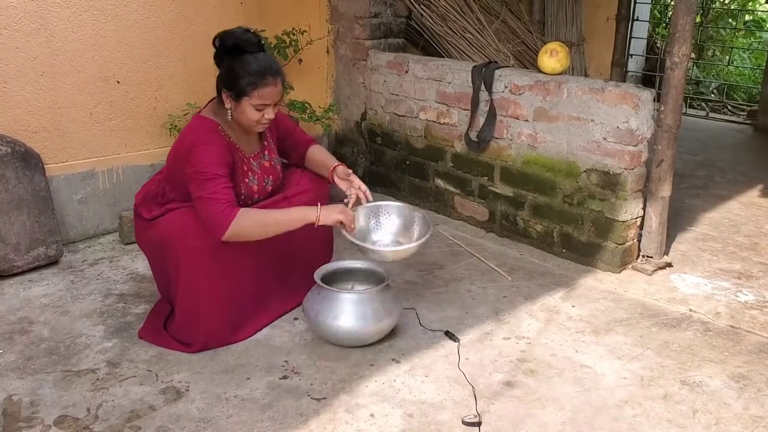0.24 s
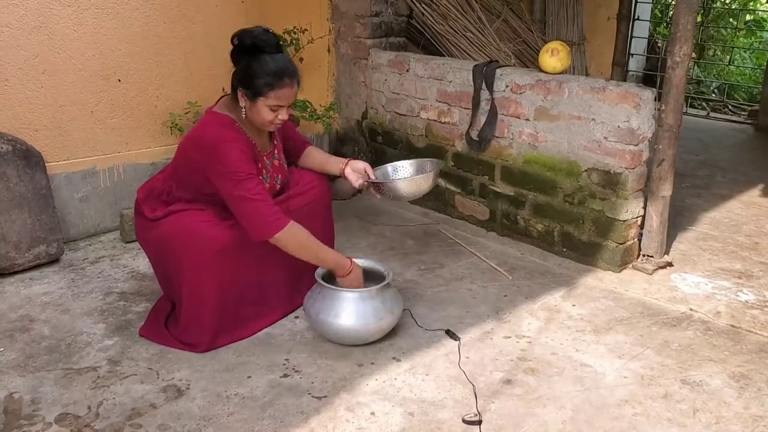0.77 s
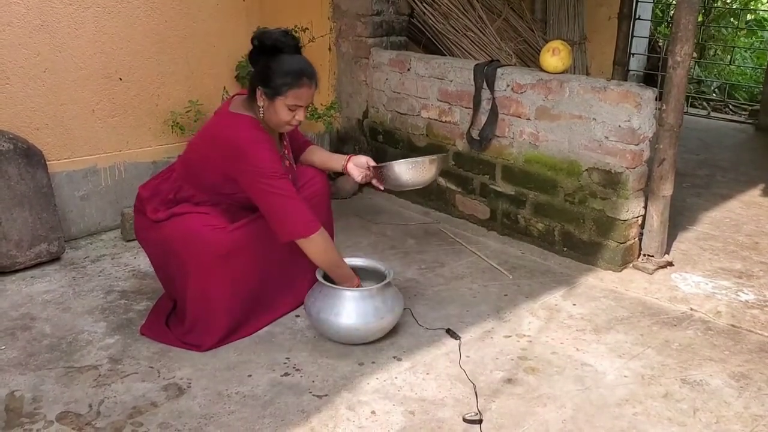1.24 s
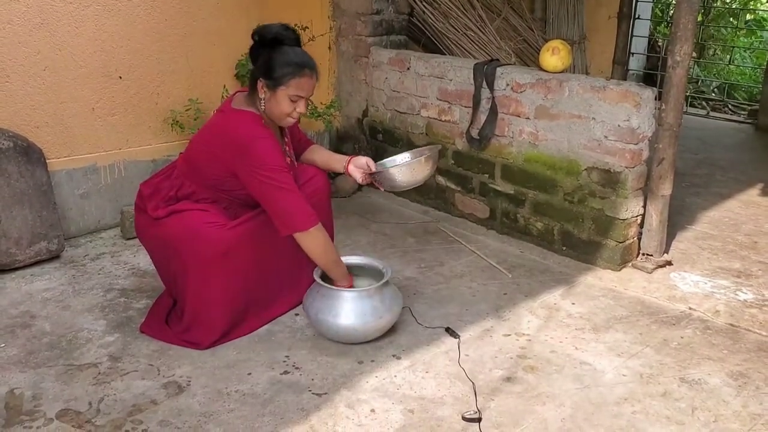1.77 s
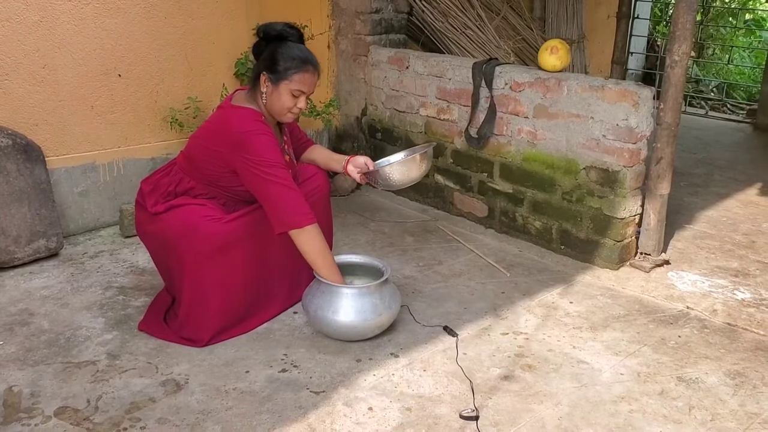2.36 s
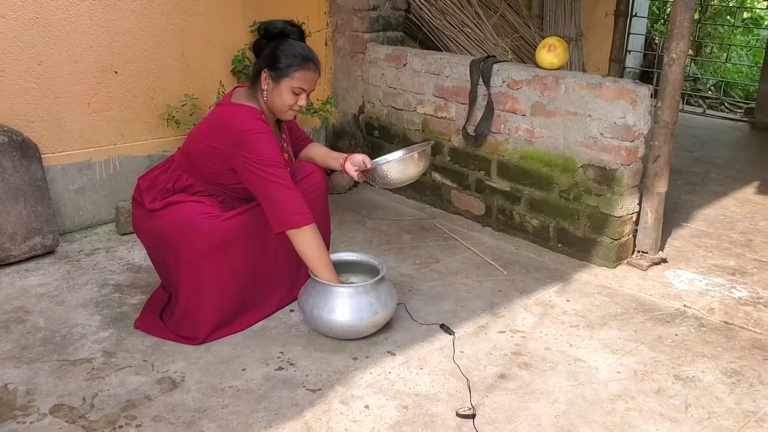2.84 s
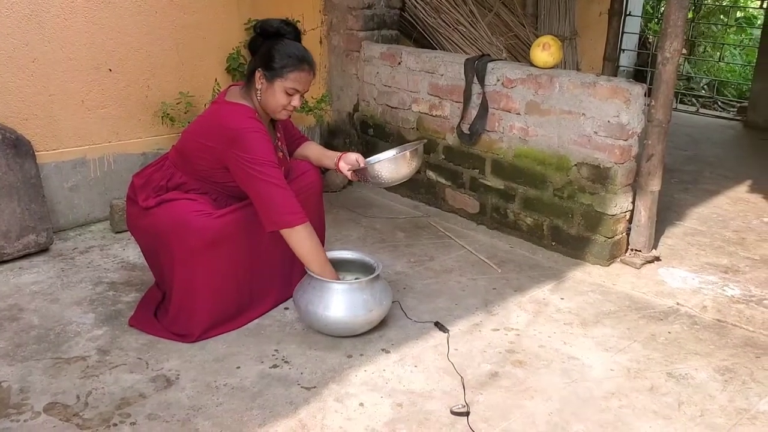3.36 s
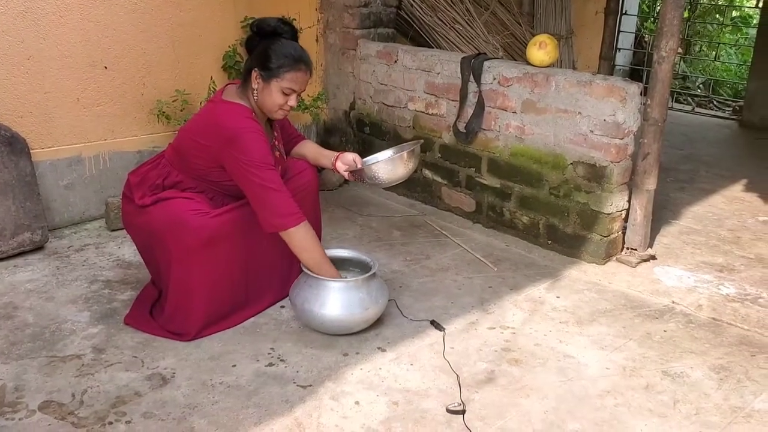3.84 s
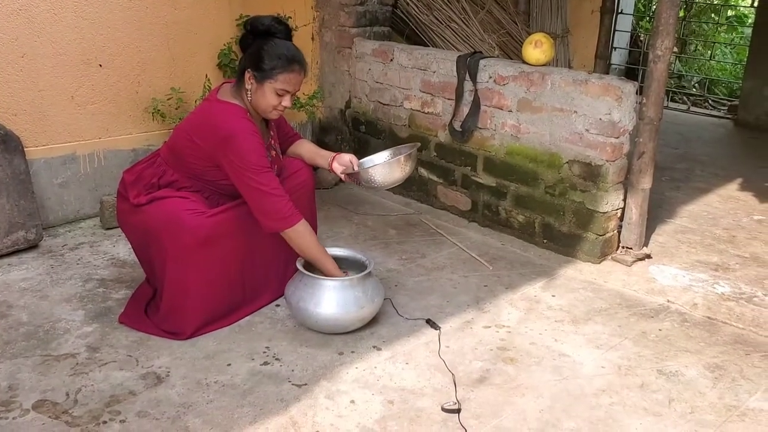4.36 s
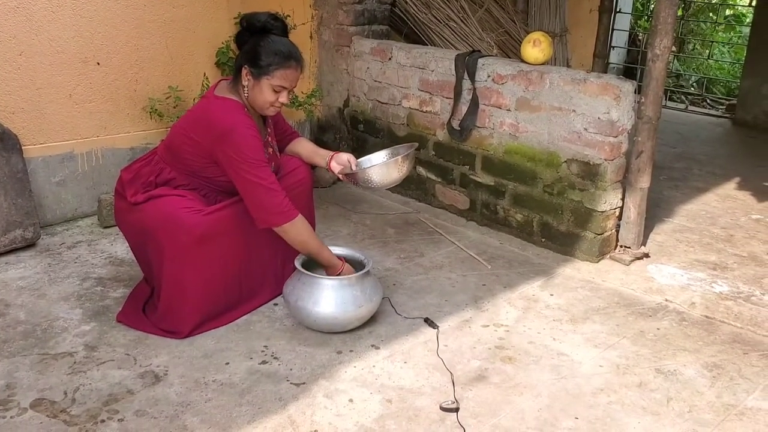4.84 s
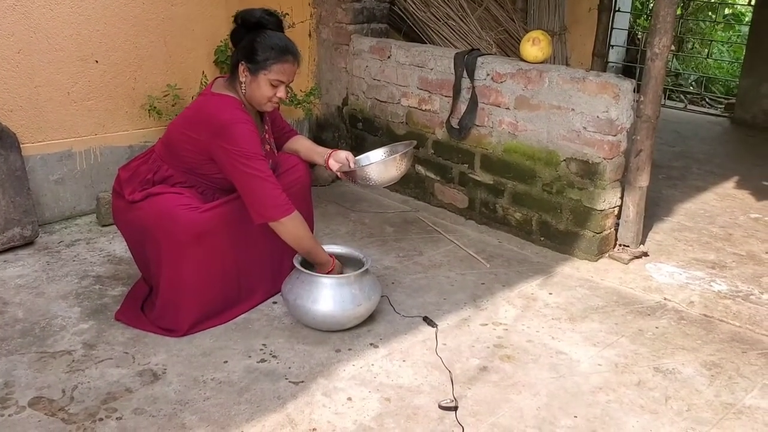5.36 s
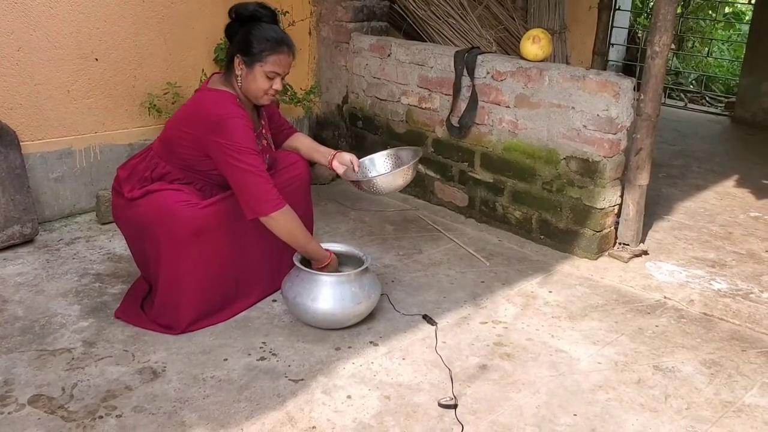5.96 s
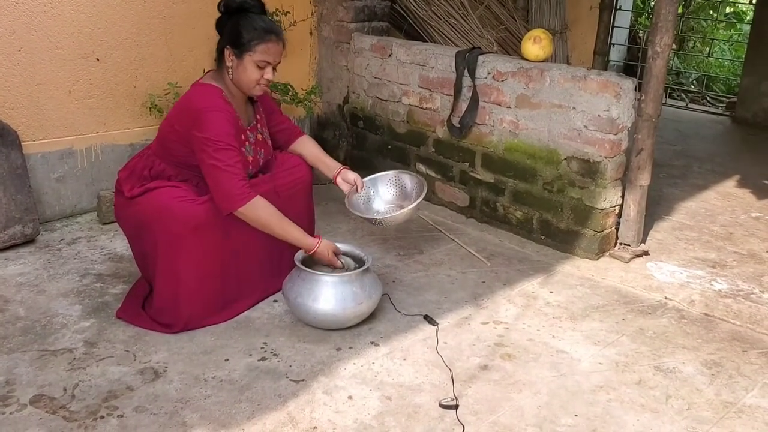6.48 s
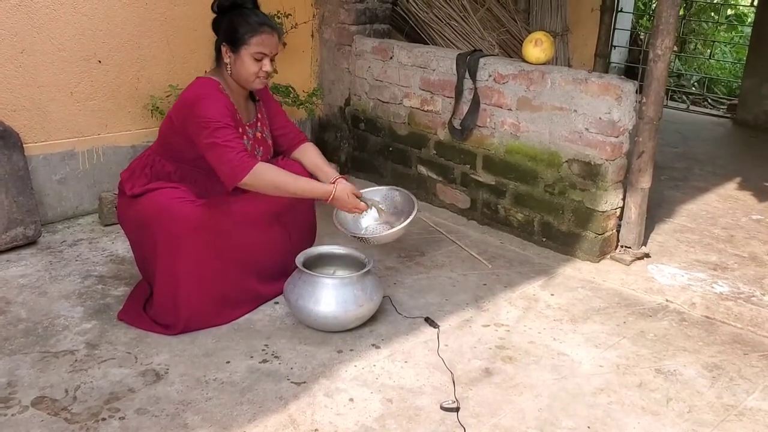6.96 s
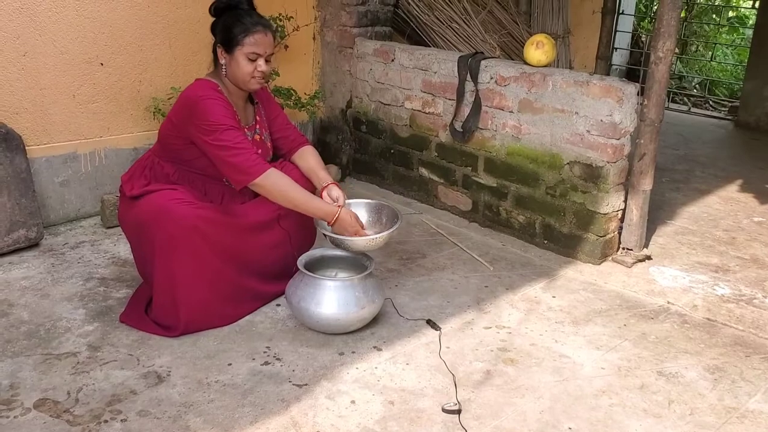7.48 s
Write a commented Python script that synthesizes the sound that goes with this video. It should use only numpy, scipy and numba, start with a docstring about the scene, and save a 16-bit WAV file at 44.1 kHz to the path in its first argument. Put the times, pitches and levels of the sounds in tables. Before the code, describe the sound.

Live fish thrash twice in a metal pot of water, splashing and dripping, with light steel bowl clatter and a faint low hum.

```python
"""Live fish thrash twice in an aluminium pot of water as a hand gropes for them. Surges and slaps throw
up spray and clouds of bubbles, each bubble a damped oscillator, and the pot's belly resonates with them;
then the water laps and drips. A steel bowl in the other hand and the pot's rim ring in their natural
modes when knocked and sing when rubbed. Bangles slide, a sleeve brushes and the yard's walls reflect
these sounds, while a small bird calls and a far motor hums."""
import sys
import numpy as np
from scipy import signal
from scipy.fft import rfft, irfft
from scipy.io import wavfile
from scipy.ndimage import uniform_filter1d
from numba import njit

SR = 44100
rng = np.random.default_rng(int(sys.argv[2]) if len(sys.argv) > 2 else 0)


def log_audio(samples):
    """Write samples as a 16-bit WAV file to the path given in sys.argv[1]."""
    # one column per channel
    frames = np.atleast_2d(samples).T
    # limit to full scale, then quantise
    limited = np.clip(frames, -1, 1)
    pcm = np.round(limited * 32767).astype(np.int16)
    wavfile.write(sys.argv[1], SR, pcm)


N = 340421
TIME = np.arange(N) / SR
TOP_HZ = 15700  # highest starting pitch of a bubble, and the recorder's cutoff

# Surges of the fish. Each row: time of full strength and hold in seconds, fizz level in dB,
# slosh in dB relative to the fizz.
SURGES = [(1.527, .1, -21, -10), (1.96, 0.071, -29, -17.5), (2.075, 0.031, -26.5, -3.5),
          (3.329, 0.11, -29, -12.5), (3.572, 0.047, -28.5, -10), (3.746, 0.017, -34.5, -16.5),
          (3.939, 0.099, -37, -8.5), (4.272, 0.057, -47.5, -1.5)]
# Slaps of fish and hand. Each row: start in seconds, level in dB, depth from 0 glancing to 1 plunging.
SLAPS = [(1.5317, -15, 0.96), (1.5713, -14, .55), (1.6032, -15, .5), (1.6735, -25.5, .5), (1.7157, -25, .6),
         (1.8769, -15.5, .55), (1.9315, -27.5, 0.91), (1.9608, -25.5, 0.13), (2.0446, -19.5, .6),
         (2.0723, -19.5, 0.1), (2.237, -30.5, 0.52), (2.2996, -48, 0.89), (2.445, -41, 0.95),
         (2.637, -45, 0.18), (3.3033, -29, 0), (3.36, -17, .75), (3.384, -25.5, .95), (3.548, -26, .1),
         (3.6334, -23.5, 0), (3.7635, -20, 0.27), (3.81, -26, 0.59), (4.0524, -24, .6), (4.342, -51, .6),
         (4.4008, -37.5, .1)]
# The largest bubbles and drips. Each row: start in seconds, pitch in Hz, level in dB.
BUBBLES = [(1.09, 2150, -29), (1.476, 825, -15.5), (1.538, 637, -2), (1.541, 1560, 6), (1.563, 448, -9),
           (1.63, 1210, -0.5), (1.707, 2390, -1), (1.773, 723, -9.5), (1.796, 2560, -5),
           (1.883, 1330, -10.5), (1.933, 2800, -7), (2.039, 1680, -3.5), (2.057, 798, -7), (2.069, 1595, 0),
           (2.114, 2230, -6.5), (2.304, 2110, -10.5), (2.446, 1410, -9.5), (2.448, 2240, -12.5),
           (2.503, 2620, -16), (2.658, 1730, -27), (2.691, 2610, -26.5), (3.255, 2380, -19),
           (3.299, 2130, -6.5), (3.363, 1950, 0), (3.364, 2820, -0.5), (3.383, 323, -12.5),
           (3.382, 410, -7), (3.383, 1750, -3), (3.411, 313, -10.5), (3.466, 425, -2), (3.468, 722, -10.5),
           (3.495, 754, -12.5), (3.498, 370, -12), (3.513, 3070, -10.5), (3.542, 1434, 1.5),
           (3.58, 713, -10.5), (3.658, 2620, -3.5), (3.766, 2246, -1), (3.766, 730, -19.5),
           (3.813, 2250, -9), (3.866, 723, -18.5), (3.945, 748, -18), (3.99, 2320, -0.5), (4.03, 4470, -4),
           (4.077, 3290, -6), (4.158, 4350, -19.5), (4.269, 1980, -21), (4.343, 3070, -15),
           (4.84, 751, -18.5), (5.004, 2380, -10.5), (5.043, 1960, -17), (5.107, 797, -21),
           (5.308, 2830, -21), (5.321, 1820, -9.5)]
# Tail beats under water. Each row: start in seconds, level in dB.
TAIL_BEATS = [(1.336, -15.5), (2.229, -13), (2.385, -13), (2.45, -16), (2.537, -10), (2.595, -11.5)]
# Sweeps of the hand. Each row: start in seconds, wash level in dB, hiss in dB relative to the wash.
SWEEPS = [(2.879, -72, 7), (4.13, -46.5, -5.5), (4.508, -42.5, -3), (4.62, -60, -4.5), (4.836, -45, -3.5),
          (4.999, -61, 10.5), (5.194, -43, -21), (5.422, -56.5, -7), (6.381, -84.5, 14)]
# Resonances of the pot's air and wall. Each row: frequency in Hz, 60 dB decay time (t60) in seconds,
# gain at resonance in dB over the direct sound.
POT_MODES = [(323, 0.068, -7), (460, 0.15, -4), (779.5, 0.16, 12.5), (833.3, 0.088, 10), (1020, 0.39, -16),
             (1220, 0.17, 10.5), (1598, 0.16, 2), (1730, 0.19, -2), (2100, 0.44, -4), (2480, 0.43, -0.5),
             (2870, .25, -5), (2967, 0.23, -10.5)]
# Modes of the steel bowl and the pot's rim. Each row: frequency in Hz, level in dB, t60 in seconds.
BOWL_MODES = [(707, -12, .6), (1070, 2.5, 0.17), (1125, -6.5, 1), (1180, -6.5, 0.99), (1348, -4, 0.89),
              (1598, -12, 0.77), (1715, -8, 0.86), (1778, 3.5, 0.56), (1853, -4, 0.97), (1961, -5, 0.89),
              (2010, 2, 0.46), (2123, 2.5, 0.51), (2273, -2, 0.53), (2308, 8, 0.46), (2445, 5, 0.24),
              (2870, -11, 0.35), (2929, -17, 0.3), (2970, -4, 0.44), (3160, -3, 0.32), (3170, -1, 0.24),
              (3560, -11.5, 0.17), (3924, -6, 0.5), (4420, -21, .25), (5270, 5, .22)]
RIM_MODES = [(967, 4.5, 0.26), (1056, -29, 0.15), (1610, 8, .3), (1974, -1.5, 0.37), (2140, 11, 0.35),
             (2120, 4, 0.27), (2510, -27, 0.253), (2610, 13.5, 0.14), (3270, -15.5, 0.33),
             (3920, 2.5, 0.29), (3770, 6, 0.2)]
# Scrapes and knocks on the bowl; bumps of wrist and bowl on the rim. Each row: start in seconds, ring
# and clatter levels in dB, contact time in seconds, lower band edge and brightness in Hz.
BOWL_KNOCKS = [(0.0, -32, -23, 0.12, 1430, 3840), (.041, -41, -22.5, 0.004, 1520, 3480),
               (.411, -63.5, -41.5, 0.1, 1680, 5960), (7.467, -72.5, -38.5, 0.065, 260, 613),
               (7.47, -49, -42.5, 0.14, 906, 2830), (7.623, -64.5, -37.5, 0.08, 750, 4200),
               (7.632, -81, -38.5, 0.045, 2610, 8600)]
RIM_KNOCKS = [(5.334, -41, -40.5, 0.016, 1340, 3750), (5.48, -62, -57, 0.077, 1207, 2820),
              (5.89, -59, -60, 0.43, 1290, 4440)]
# Tones of the bowl dragging on the floor and of the rim under the wet arm.
# Each row: frequency in Hz, level in dB.
BOWL_SONG = [(1057, -27), (1110, -40), (1597, -36.5)]
RIM_SONG = [(505, -52.5), (1585, -47.5)]
# Bangles sliding along the arm. Each row: start in seconds, level in dB, rise time in seconds.
BANGLE_SLIDES = [(.468, -54, 0.031), (.65, -63.5, .012), (1.28, -71, .04)]
# Sleeve and arm brushing dress and rim, and one short sharp hiss of spray at 5.12 s. Each row: start in
# seconds, level in dB, rise time in seconds, lower and upper band edges in Hz.
BRUSHES = [(0.299, -58.5, 0.14, 400.5, 2230), (1.1, -64, .16, 2597, 5700), (5.119, -42, 0.0048, 2500, 6940),
           (5.838, -55, 0.026, 2140, 5170)]
# Bird calls. Each row: start in seconds, top pitch in Hz, level in dB.
CHIRPS = [(6.835, 5440, -68.5), (6.985, 4964, -57), (7.15, 4800, -65.5)]
# The course of the motor's hum. Each row: time in seconds, level in dB.
HUM_LEVELS = [(0.0, -48), (0.08, -58), (2.64, -46), (2.69, -52), (3.87, -38.5), (7.72, -49)]
# Spectral shapes of the water, the bangles and the yard's air. Each row: frequency in Hz, gain in dB.
FIZZ_COLOUR = [(500, -17.5), (900, -9.5), (1400, -9), (2300, 2.5), (3200, -4), (4500, -0.5), (6000, -5.5),
               (9000, -38)]
SLOSH_COLOUR = [(120, -23), (230, -12), (320, -1.5), (480, 3.5), (750, 1.5), (950, -5.5), (1400, -33)]
SPRAY_COLOUR = [(2500, -18.5), (4500, -12), (6000, -1), (8000, -3.5), (11000, -4.5), (15500, -4)]
BANGLE_COLOUR = [(1000, -10.5), (2500, -6), (4000, -12.5), (6200, 5.5), (8500, 0.5), (11000, -2.5),
                 (15500, -2)]
AIR_COLOUR = [(15, -39.5), (25, -7), (55, -7.5), (75, -6.5), (91, -4), (173, -19), (198, -15), (322, -24),
              (368, -22), (509, -31), (919, -32.5), (1270, -37.5), (1530, -42.5), (3170, -49),
              (15500, -63.5)]
WASH_COLOUR = [(130, -8), (250, 1.5), (550, 2), (800, -4.5), (1500, -5.5)]
HISS_COLOUR = [(900, -1), (2400, 9), (3600, 5), (5200, 4.5), (7000, -11), (13000, -13)]


def water(drive):
    """Air entrainment: agitation drives three sizes of bubble, heard as fizz, deep slosh and fine spray."""
    fizz = colour(cloud(852, 6630, cycles=11.4, spread_db=5.5, rise=0.052, count=15000), FIZZ_COLOUR)
    slosh = colour(cloud(200, 1100, cycles=6.4, spread_db=8.5, rise=0.15, count=3000), SLOSH_COLOUR)
    spray = colour(cloud(4000, 15500, cycles=9, spread_db=7, rise=0.09, count=36000), SPRAY_COLOUR)
    # water tears and closes in uneven spurts
    return sum(row * unit(grains * undb(2 * walk(190)))
               for row, grains in zip(drive, (fizz, slosh, spray)))


def surges():
    """Incoherent addition: surges rise, hold, settle and sum in power as fizz, slosh and spray drive."""
    rise_db_per_s, settle_db_per_s, spray_db = 416.5, (78.5, 130.5, 68.5), -13.5
    power = np.zeros((3, N))
    for s, hold, db, slosh_db in SURGES:
        early, late = np.maximum(s - TIME, 0), np.maximum(TIME - s - hold, 0)
        for row, share_db, settle in zip(power, (0, slosh_db, spray_db), settle_db_per_s):
            row += undb(db + share_db - rise_db_per_s * early - settle * late) ** 2
    return np.sqrt(power)


def slaps(t60):
    """Impulsive excitation: a glancing slap drives a burst of spray, a plunging one a burst of slosh."""
    glancing_db, plunging_db = (-2.5, -37, 0.5), (-3, 0.5, -15)  # fizz, slosh, spray
    drive, t = np.zeros((3, N)), TIME[:SR // 2]
    burst = fade(t, t60) * (1 - np.exp(-t / 0.00011))
    for s, db, depth in SLAPS:
        for row, glancing, plunging in zip(drive, glancing_db, plunging_db):
            add(row, s, undb(db + glancing + depth * (plunging - glancing)) * burst)
    return drive


@njit
def ring_bubbles(starts, hz, cycles, sizes, rise, swell_cycles):
    """Damped oscillation: a bubble swells, falls 60 dB over its cycles and rises in pitch as it surfaces."""
    out = np.zeros(N)
    for k in range(len(starts)):
        first, length, phase = int(starts[k] * SR), cycles[k] / hz[k] * SR, 0.
        for i in range(min(int(length), N - first)):
            age = i / length
            phase += hz[k] * (1 + rise * age) / SR
            envelope = np.exp(-6.9 * age) * (1 - np.exp(-phase / swell_cycles))
            out[first + i] += sizes[k] * envelope * np.sin(2 * np.pi * phase)
    return out


def cloud(low_hz, high_hz, cycles, spread_db, rise, count):
    """Superposition: many brief rings of random pitch, size and life merge into a noise of even level."""
    when, pitch, size, life = rng.random((count, 4)).T
    hz = low_hz * (min(high_hz, TOP_HZ) / low_hz) ** pitch
    sizes = undb(-spread_db * np.log(1 - .98 * size))
    x = ring_bubbles(when * N / SR, hz, cycles * (.5 + life), sizes, float(rise), swell_cycles=.7)
    return x / np.sqrt(uniform_filter1d(x ** 2, size=1100) + 1e-9)


def plops(cycles, rise):
    """Constant Q: bubbles from fins, fingers and drops ring for equal cycles, so big ones last longer."""
    s, hz, db = np.array(BUBBLES, float).T.copy()
    return ring_bubbles(s, hz, np.full(len(s), cycles), undb(db), rise, swell_cycles=1.4)


def strays(strength, low_hz, high_hz, cycles, top_db, range_db, rise, count):
    """Shot noise: lone bubbles or drops come at random, as strong as the water is busy; few are loud."""
    when, pitch, size = rng.random((count, 3)).T
    hz = low_hz * (min(high_hz, TOP_HZ) / low_hz) ** pitch
    sizes = strength[(when * N).astype(int)] * undb(top_db - range_db * np.sqrt(size))
    return ring_bubbles(when * N / SR, hz, np.full(count, float(cycles)), sizes, rise, swell_cycles=.9)


def drops(stirred, drain_s):
    """Exponential relaxation: thrown water drains off wall and arm, ticking back after each surge."""
    keep = np.exp(-1 / (drain_s * SR))
    wet = signal.lfilter([1 - keep], [1, -keep], stirred)
    return strays(wet, 3000, 14000, cycles=9, top_db=5.5, range_db=22.5, rise=.05, count=700)


def tail_beats(hz, cycles, sag):
    """Heavy damping: each tail beat under water is a dull throb of a few cycles, sagging in pitch."""
    s, db = np.array(TAIL_BEATS, float).T.copy()
    each = np.ones(len(s))
    return ring_bubbles(s, hz * each, cycles * each, undb(db), -sag, swell_cycles=.7)


def sweeps():
    """Displacement and friction: the hand pushes a low wash aside, and skin hisses along the wall."""
    wash = unit(colour(cloud(139, 1540, cycles=8.9, spread_db=5, rise=0.29, count=5000), WASH_COLOUR))
    hiss = colour(cloud(830, 13000, cycles=8.1, spread_db=1, rise=0, count=50000), HISS_COLOUR)
    hiss = unit(hiss * undb(3.5 * walk(70)))  # fingers catch and slip
    # small bubbles slip out
    hiss += strays(np.ones(N), 1200, 6000, cycles=20, top_db=17, range_db=21.5, rise=.12, count=380)
    out = np.zeros(N)
    for s, db, hiss_db in SWEEPS:
        rise_s = 0.036 * 2 ** ((-37.5 - db) / 28)  # a sweep 28 dB gentler rises twice as slowly
        out += undb(db) * swell(s, rise_s) * (wash + undb(hiss_db) * hiss)
    return out


def pot(x, belly_t60, belly_db):
    """Cavity resonance: the pot rings with the water; its quick echoes shift as the surface heaves."""
    t = TIME[:SR // 2]
    ringing = sum(undb(db) * 2 * np.log(1000) / (t60 * SR) * fade(t, t60) * np.sin(2 * np.pi * hz * t)
                  for hz, t60, db in POT_MODES)
    out = x + through(x, ringing)
    weights = np.array([walk(22) for _ in range(5)])
    for weight in weights / np.linalg.norm(weights, axis=0):
        echoes = band(rng.standard_normal(len(t)), 600, 7500, order=1) * fade(t, belly_t60) * (t > .001)
        out += undb(belly_db) * through(x * weight, unit(echoes) / np.sqrt(len(t)))
    return undb(-2) * out


def knocks(contacts, modes, shimmer_db, shimmer_t60):
    """Free vibration: after a run of tiny impacts, strong modes ring on over a shimmer of weak ones."""
    out, t = np.zeros(N), TIME[:SR]
    for s, ring_db, clatter_db, contact_s, low_hz, bright_hz in contacts:
        impacts = rng.standard_normal(SR) * undb(2.5 * rng.standard_normal(SR // 60 + 1).repeat(60)[:SR])
        envelope = fade(t, contact_s) + undb(shimmer_db) * fade(t, shimmer_t60)
        clatter = unit(band(impacts, low_hz, bright_hz)) * envelope
        ring = np.zeros(SR)
        for hz, db, t60 in modes:
            gain = undb(db) / np.hypot(1, (hz / bright_hz) ** 4)  # soft contact leaves high modes quiet
            detuned_hz = hz * (1 + 0.00077 * rng.standard_normal())
            ring += gain * fade(t, t60) * np.sin(2 * np.pi * (detuned_hz * t + rng.random()))
        build_up = 1 - fade(t, 0.097 * contact_s)  # long contact builds the ring slowly
        add(out, s, undb(ring_db) * ring * build_up + undb(clatter_db) * clatter)
    return out


def song(modes, start, peak, end):
    """Frictional excitation: rubbing swells a few modes unsteadily and lets them die."""
    envelope = np.interp(TIME, [start, peak, end], [0, 1, 0]) * undb(2 * walk(70))
    return envelope * sum(undb(db) * tone(hz * (1 + 0.0057 * walk(90))) for hz, db in modes)


def bangles():
    """Sliding friction: tiny rings merge into a faint bright grating as the arm reaches across."""
    grains = cloud(1500, TOP_HZ, cycles=14, spread_db=1, rise=0, count=16000)
    envelope = sum(undb(db) * swell(s, rise_s) for s, db, rise_s in BANGLE_SLIDES)
    return unit(colour(grains, BANGLE_COLOUR)) * envelope


def brushes(rough_db):
    """Friction noise: sleeve and arm rub softly and unevenly as the body leans; a brief hiss of spray is shaped
    the same way."""
    return sum(undb(db + rough_db * walk(29)) * swell(s, rise_s)
               * unit(band(rng.standard_normal(N), low_hz, high_hz, order=3))
               for s, db, rise_s, low_hz, high_hz in BRUSHES)


def walls(x, t60, wet_db):
    """Reverberation: house front and brick wall return a thin, duller tail."""
    t = TIME[:SR]
    tail = band(rng.standard_normal(SR), 240, 4100, order=1) * fade(t, t60) * (t > .008)
    return x + undb(wet_db) * through(x, unit(tail) / np.sqrt(SR))


def bird(call_s, echo_t60):
    """Scattering: each call arches up and drops away, arriving mostly as echo from the leaves."""
    calls, age = np.zeros(N), np.linspace(0, 1, int(call_s * SR))
    arch = np.interp(age, [0, .25, .45, .65, 1], [.85, .96, 1, .93, .6])
    envelope = np.sqrt(np.sin(np.pi * age).clip(0))
    for s, hz, db in CHIRPS:
        add(calls, s, undb(db) * envelope * tone(hz * arch))
    echo = unit(rng.standard_normal(SR) * fade(TIME[:SR], echo_t60)) / np.sqrt(SR)
    return undb(-18) * calls + undb(-0.5) * through(calls * undb(4.5 * walk(360)), echo)


def motor(hz):
    """Random modulation: a far motor's hum wavers in pitch and level over a low rumble."""
    hum = tone(hz * (1 + 0.02594 * walk(6.8))) * undb(1 + 2 * walk(14))
    rumble = undb(-7) * unit(band(rng.standard_normal(N), 60, 150))
    times, db = np.transpose(HUM_LEVELS)
    return (hum + rumble) * undb(np.interp(TIME, times, db))


def yard_air(db):
    """Ambient noise: the yard's soft air, strongest in the bass; db sets its level above 200 Hz."""
    air = colour(rng.standard_normal(N), AIR_COLOUR)
    return air * undb(db + .8 * walk(4)) / np.std(band(air, 200, 15000, order=4))


def undb(db):
    """The decibel scale: 20 dB is a factor of ten in amplitude."""
    return 10 ** (np.asarray(db) / 20)


def unit(x):
    """Normalisation to an rms of 1."""
    return x / np.sqrt(np.mean(x ** 2) + 1e-18)


def tone(hz):
    """Phase as the integral of frequency: a sine that follows a changing pitch."""
    return np.sin(2 * np.pi * np.cumsum(hz) / SR)


def fade(t, t60):
    """Exponential decay, 60 dB down after t60."""
    return np.exp(-np.log(1000) * t / max(t60, 1e-4))


def swell(s, rise_s):
    """Growth and decay: a push starts at s, peaks after rise_s and ebbs away."""
    age = np.maximum(TIME - s, 0) / rise_s
    return np.sqrt(age * np.exp(1 - age))


def walk(rate):
    """Low-pass noise: a smooth wander of rms 1, with rate new values a second."""
    hold = int(SR / rate)
    steps = np.repeat(rng.standard_normal(N // hold + 1), hold)
    return unit(uniform_filter1d(uniform_filter1d(steps, hold), hold)[:N])


def add(out, s, x):
    """Superposition of x on out from time s."""
    i = int(np.clip(s * SR, 0, N - 1))
    out[i:i + len(x)] += x[:N - i]


def through(x, response):
    """Convolution with an impulse response."""
    return signal.oaconvolve(x, response)[:len(x)]


def band(x, low_hz, high_hz, order=2):
    """Band-pass filtering."""
    return signal.sosfilt(signal.butter(order, [low_hz, high_hz], "band", fs=SR, output="sos"), x)


def colour(x, points):
    """Minimum-phase filtering: folding the cepstrum gives a causal response with this (Hz, dB) shape."""
    hz, db = np.transpose(points)
    size = 4096
    grid = np.maximum(np.arange(size // 2 + 1) * SR / size, 1)
    gain = undb(np.interp(np.log(grid), np.log(hz), db))
    cepstrum = irfft(np.log(gain))
    cepstrum[1:size // 2] *= 2
    cepstrum[size // 2 + 1:] = 0
    return through(x, irfft(np.exp(rfft(cepstrum))))


def scene():
    """Source and filter: the water sounds through the pot, and all near sounds reflect off the walls."""
    stir = surges()
    bubbles = plops(cycles=22.6, rise=0.16)
    bubbles += strays(stir[0], 1000, 4800, cycles=46, top_db=18.5, range_db=16, rise=.13, count=420)
    in_pot = water(stir + slaps(t60=0.064)) + bubbles + drops(stir[0], drain_s=0.49) + sweeps()
    fish = pot(in_pot, belly_t60=0.03, belly_db=-3) + tail_beats(hz=116, cycles=3.2, sag=0.15)
    bowl = knocks(BOWL_KNOCKS, BOWL_MODES, shimmer_db=-13.5, shimmer_t60=0.51)
    bowl *= undb(2 * walk(70))  # the bowl swings in the hand, so its ring flutters
    bowl += song(BOWL_SONG, start=0.013, peak=0.094, end=.25)
    rim = knocks(RIM_KNOCKS, RIM_MODES, shimmer_db=8.5, shimmer_t60=0.24)
    rim += song(RIM_SONG, start=5.88, peak=5.99, end=6.16)
    near = walls(fish + bowl + rim + bangles() + brushes(rough_db=3.9), t60=0.26, wet_db=-17.5)
    far = bird(call_s=.085, echo_t60=0.37) + motor(hz=86) + yard_air(db=-57)
    return (near + far)[None]


def record(dry):
    """Band limiting and saturation: the recorder drops deep rumble, rounds peaks and cuts the top."""
    x = signal.sosfilt(signal.butter(4, 35, "high", fs=SR, output="sos"), dry)
    return signal.sosfilt(signal.ellip(10, .2, 80, TOP_HZ, fs=SR, output="sos"), np.tanh(x))


dry = scene()
out = record(dry)
log_audio(out)
```